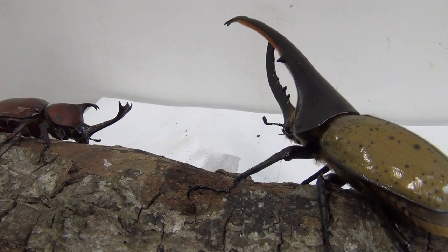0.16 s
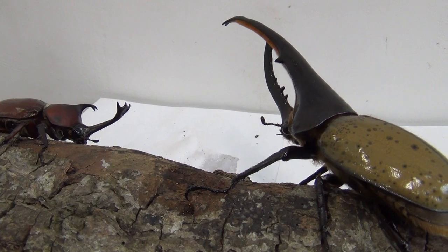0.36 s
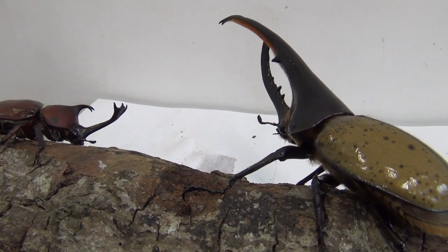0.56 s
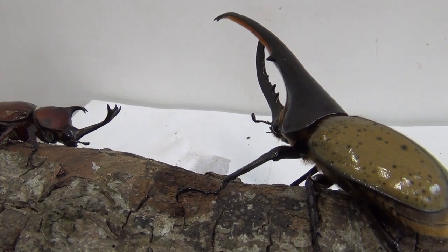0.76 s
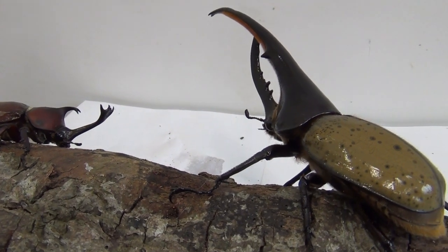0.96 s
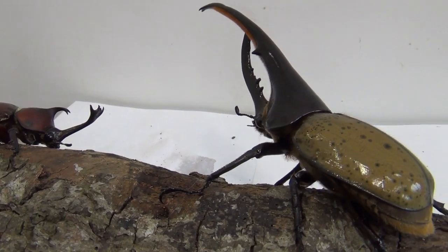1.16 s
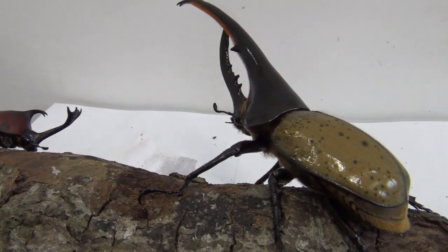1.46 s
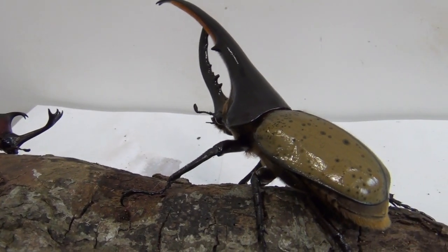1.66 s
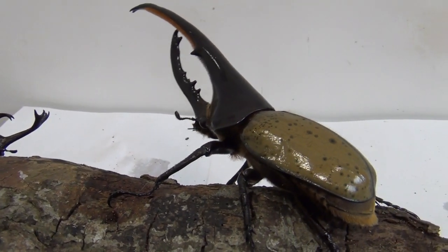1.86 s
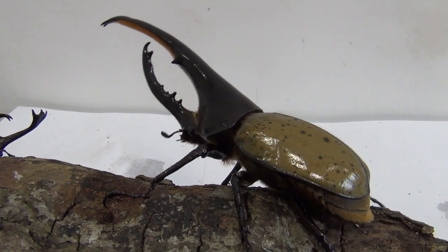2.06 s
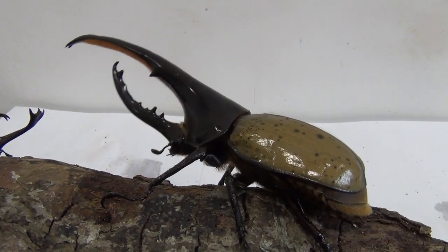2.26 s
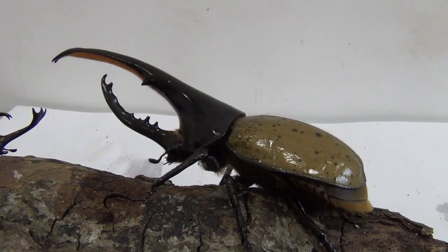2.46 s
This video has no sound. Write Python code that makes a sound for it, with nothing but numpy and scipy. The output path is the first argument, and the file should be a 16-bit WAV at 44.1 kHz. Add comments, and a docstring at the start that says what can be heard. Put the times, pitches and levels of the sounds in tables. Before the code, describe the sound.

A large beetle's claws snap and tick sparsely on rough bark over steady soft hiss

```python
"""Beetle on a bark-covered log

A large beetle clambers along a log in a quiet room. Its claws catch and snap free: each snap is a decaying
noise burst together with ringing modes of the bark and the hard leg; short low knocks of springing bark
sound near most of them. In between the claws drag (random slips, filtered) and tick faintly, with weak
room reflections, over steady shaped noise for room and microphone hiss, a faint hum and a thin whine."""
import sys
import numpy as np
from scipy import signal
from scipy.fft import rfft, irfft
from scipy.io import wavfile

SR = 44100
rng = np.random.default_rng(int(sys.argv[2]) if len(sys.argv) > 2 else 0)


def generate_wav(sig):
    """Save sig (samples, or channels by samples) to the path in sys.argv[1] as 16-bit PCM at SR."""
    pcm = np.round(np.clip(np.atleast_2d(sig).T, -1, 1) * 32767).astype(np.int16)
    wavfile.write(sys.argv[1], SR, pcm)


N = 115542  # samples


def from_db(db):
    """Logarithmic level: 20 dB is a factor of ten in amplitude."""
    return 10 ** (np.asarray(db) / 20)


def rms_one(x):
    """Power normalisation: scale to a root mean square of 1."""
    return x / np.sqrt(np.mean(x ** 2) + 1e-20)


def since(start_s):
    """Causality: seconds elapsed since an event, zero before it."""
    return np.maximum(np.arange(N) / SR - start_s, 0)


def dying(t, t60_s):
    """Exponential damping: the amplitude falls by 60 dB in t60_s."""
    return np.exp(-np.minimum(np.log(1000) * t / t60_s, 50))


def band(x, centre_hz, octaves):
    """Band-pass filtering, with the upper edge limited because soft bark cracks little above it."""
    bark_top_hz = 12500
    half = 2 ** (octaves / 2)
    low_hz = centre_hz / half
    high_hz = min(centre_hz * half, bark_top_hz, SR / 2 - 1000)
    sos = signal.butter(2, [low_hz, high_hz], "band", fs=SR, output="sos")
    return signal.sosfilt(sos, x)


def resonate(x, hz, width_hz):
    """Damped resonance: a pole pair whose radius sets the bandwidth."""
    radius = np.exp(-np.pi * width_hz / SR)
    poles = [1, -2 * radius * np.cos(2 * np.pi * hz / SR), radius * radius]
    return signal.lfilter([1, 0, -1], poles, x + 1e-18)  # the offset keeps silence off exact zero


def shaped(x, spectrum, share=1):
    """Spectral shaping: apply a share of a dB curve, interpolated over log frequency."""
    hz, db = np.transpose(spectrum)
    f = np.maximum(np.fft.rfftfreq(N, 1 / SR), 1)
    gain_db = share * np.interp(np.log(f), np.log(hz), db)
    return irfft(rfft(x) * from_db(gain_db), N)


def coloured(spectrum):
    """Stationary coloured noise: white noise given a spectrum, at rms 1."""
    return rms_one(shaped(rng.standard_normal(N), spectrum))


def struck(start_s, modes, pitch=1):
    """Modal superposition: one blow sets off damped sines, alternating in sign."""
    t = since(start_s)
    ringing = 0
    for k, (hz, db, t60_s) in enumerate(modes):
        mode = dying(t, t60_s) * np.sin(2 * np.pi * hz * pitch * t)
        ringing = ringing + (-1) ** k * from_db(db) * mode
    return ringing


def crack(start_s, db, centre_hz):
    """Brittle fracture: bark fibres give way in a noise burst of a few milliseconds."""
    attack_s, t60_s, octaves = 0.00032, 0.013, 1.7
    t = since(start_s)
    envelope = np.minimum(t / attack_s, 1) * dying(t, t60_s)
    noise = rms_one(band(rng.standard_normal(N), centre_hz, octaves))
    return from_db(db) * envelope * noise


def background():
    """Stationary noise, in phase and in antiphase between the sides, plus equipment hum and whine."""
    # noise common to both sides; columns: hz, relative level_db per Hz
    air = [(30, -37), (60, -28), (130, -20), (250, -12.5), (390, -6.5), (550, -3.5), (900, -1.83),
           (1400, -2.5), (2200, -5), (3800, -7.5), (5200, -10.5), (6200, -10), (7500, -13), (9800, -14),
           (12500, -17), (15500, -19)]
    # noise opposite between the sides; columns: hz, relative level_db per Hz
    air_wide = [(30, 5), (100, 6.5), (800, 1.5), (1300, -0.5), (2200, -11.5), (4400, -43.5), (5500, 1),
                (9500, -5.5), (12000, -19.5), (15500, -44)]
    # lean to the left, shared between the sides below; columns: hz, lean_db
    air_lean = [(100, 2), (500, 1.5), (850, 1.9), (1400, 0)]
    air_db, wide_db = -52, -67
    hum_hz, hum_width_hz, hum_db = 860, 46, -69.5
    whine_hz, whine_db = 15625, -80
    # the hum is noise through a narrow resonance, the whine a pure tone
    hum = from_db(hum_db) * rms_one(resonate(rng.standard_normal(N), hum_hz, hum_width_hz))
    whine = from_db(whine_db) * rms_one(np.sin(2 * np.pi * whine_hz * np.arange(N) / SR))
    wide = from_db(wide_db) * coloured(air_wide)
    common = from_db(air_db) * coloured(air) + hum + whine
    left = shaped(common, air_lean, 0.5) + wide
    right = shaped(common, air_lean, -0.44) - wide
    return np.array([left, right])


def room(x):
    """Diffuse reflection: convolution with a weak decaying noise tail, independent on each side."""
    delay_s, t60_s, echo_db = 0.0042, 0.068, -20
    t = since(delay_s)[:SR // 2]
    tails = rng.standard_normal((2, len(t))) * (t > 0) * dying(t, t60_s)
    echoes = [signal.fftconvolve(x, tail / np.linalg.norm(tail))[:N] for tail in tails]
    return from_db(echo_db) * np.array(echoes)


def ticks():
    """Impulsive contact: each faint footfall is a small noise burst."""
    # faint footfalls; columns: start_s, level_db, centre_hz
    footfalls = [(1.021, -54, 5000), (1.258, -48, 2500), (1.8180, -54, 4500), (1.9790, -48, 6000),
                 (2.0250, -42, 5000), (2.037, -43, 7200), (2.0630, -44.5, 4500), (2.0712, -46, 5500),
                 (2.1020, -54, 8000), (2.3570, -54, 7500), (2.462, -48, 6500), (2.4835, -46, 4500)]
    return sum(crack(*footfall) for footfall in footfalls)


def drags():
    """Stick-slip friction: a dragged claw slips many times, the bark rasps and the claw tip squeaks."""
    # claw drags; columns: start_s, length_s, rasp_db, rasp_hz (centre), squeak_db
    strokes = [(0.7988, 0.017, -50.5, 4400, -50), (0.812, 0.03, -61, 6000, -70),
               (1.435, 0.055, -64.5, 8500, -69), (2.02, 0.065, -59, 3200, -67)]
    slips_per_s, slip_spread_db, rasp_octaves = 1800, 2.5, 2.2
    squeak_hz, squeak_t60_s = 9720, 0.014
    attack_s, release_s = 0.001, 0.006
    squeak_width_hz = np.log(1000) / np.pi / squeak_t60_s
    out = np.zeros(N)
    for start_s, length_s, rasp_db, rasp_hz, squeak_db in strokes:
        # impulses at random moments, of random strength and sign
        slipping = rng.random(N) < slips_per_s / SR
        strength = from_db(slip_spread_db * rng.standard_normal(N))
        slips = slipping * strength * rng.choice([-1, 1], N)
        rasp = rms_one(band(slips, rasp_hz, rasp_octaves))
        squeak = rms_one(resonate(slips, squeak_hz, squeak_width_hz))
        t = since(start_s)
        envelope = np.minimum(t / attack_s, 1) * np.clip((length_s - t) / release_s, 0, 1)
        out += envelope * (from_db(rasp_db) * rasp + from_db(squeak_db) * squeak)
    return out


def knocks():
    """Elastic recoil: a released flake of bark springs back and rings briefly at its own pitch."""
    # recoiling flakes; columns: start_s, level_db, pitch_hz
    flakes = [(0.4520, -38.5, 1440), (0.7343, -37.5, 954), (0.7445, -43, 1300), (0.8063, -44.5, 548),
              (0.8113, -44.5, 1120)]
    attack_s, t60_s = 0.0008, 0.029
    out = np.zeros(N)
    for start_s, db, hz in flakes:
        attack = np.minimum(since(start_s) / attack_s, 1)
        out += attack * struck(start_s, [(hz, db, t60_s)])
    return out


def snaps():
    """Sudden release of strain: a claw breaks free with a crack, and the bark and the leg ring."""
    # claw releases; columns: start_s, crack_db, crack_hz (centre), bark_db, bark_pitch (factor), leg_db
    releases = [(0.4485, -36, 6840, -53, 1.43, -42), (0.7342, -39.5, 5150, -32, 0.972, -45),
                (0.7438, -40.5, 6200, -50, 1.35, -27), (0.8085, -52, 7500, -62, 1.3, -47),
                (1.1413, -39.5, 3100, -34, 1.01, -58)]
    # modes of the bark at pitch factor 1; columns: hz, level_db, t60_s
    bark_modes = [(930, -21, 0.017), (1920, -7.5, 0.012), (2270, -1.5, 0.019), (2970, -4.5, .012),
                  (4100, -6.5, 0.01), (6000, -15, .008)]
    # modes of the hard leg; columns: hz, level_db, t60_s
    leg_modes = [(3030, -16.5, 0.027), (3760, -10, 0.025), (5070, -8, 0.014), (5800, -1.5, 0.017),
                 (9100, -13, 0.018), (10750, -10, 0.017), (11280, -12, 0.019)]
    out = np.zeros(N)
    for start_s, crack_db, crack_hz, bark_db, bark_pitch, leg_db in releases:
        out += crack(start_s, crack_db, crack_hz)
        out += from_db(bark_db) * struck(start_s, bark_modes, bark_pitch)
        out += from_db(leg_db) * struck(start_s, leg_modes)
    return out


def scene():
    """Linear superposition: the beetle, slightly left by level difference, its echoes and the background."""
    pan_db = 0.8  # added on the left, taken off on the right
    air = background()
    beetle = ticks() + drags() + knocks() + snaps()
    direct = beetle * from_db([[pan_db], [-pan_db]])
    return air + direct + room(beetle)


def record(dry):
    """Band limiting: a steep elliptic low-pass cuts the top."""
    cutoff_hz = 15850
    # order 12, 0.1 dB ripple, 70 dB stop-band attenuation
    sos = signal.ellip(12, 0.1, 70, cutoff_hz, fs=SR, output="sos")
    return signal.sosfilt(sos, dry)


dry = scene()
out = record(dry)
generate_wav(out)
```